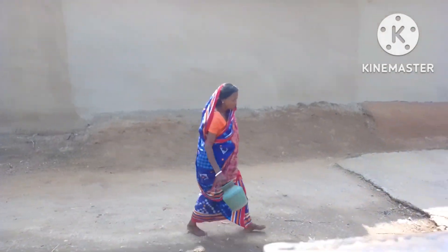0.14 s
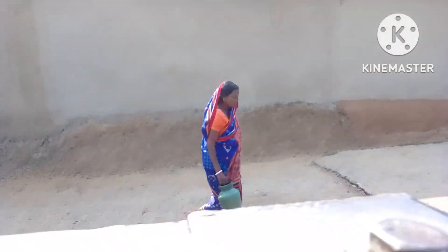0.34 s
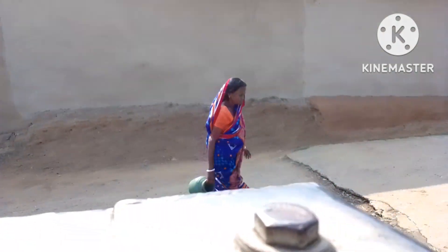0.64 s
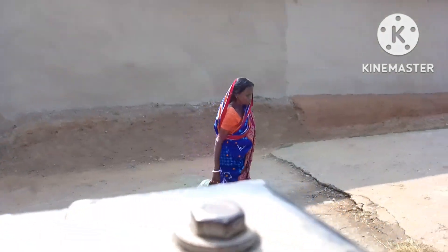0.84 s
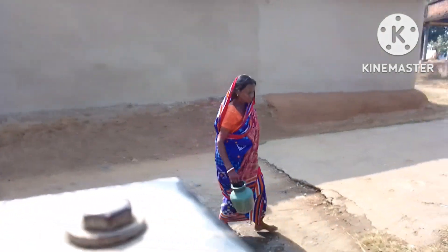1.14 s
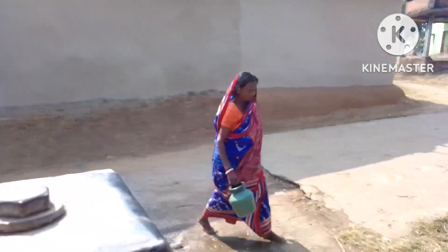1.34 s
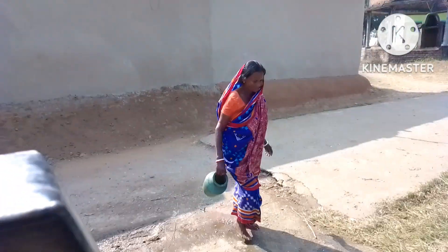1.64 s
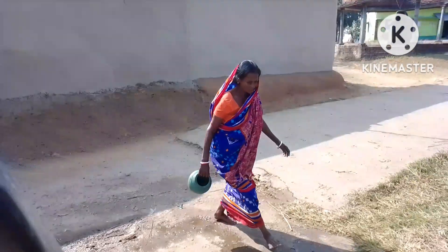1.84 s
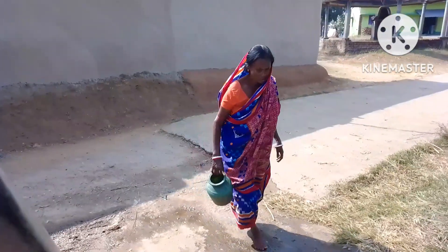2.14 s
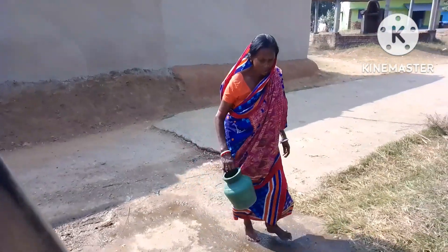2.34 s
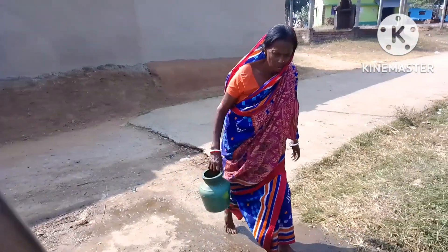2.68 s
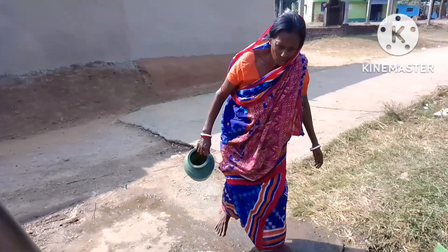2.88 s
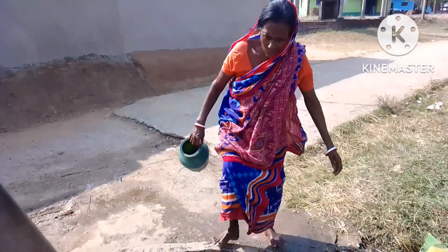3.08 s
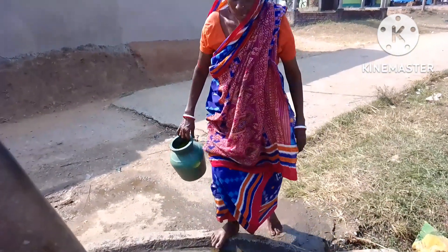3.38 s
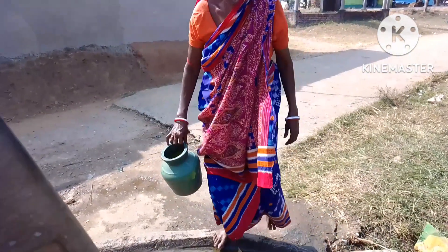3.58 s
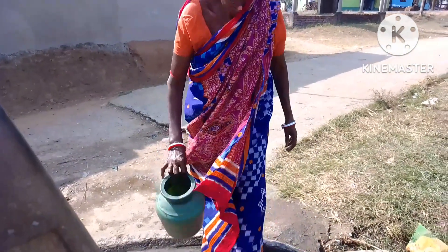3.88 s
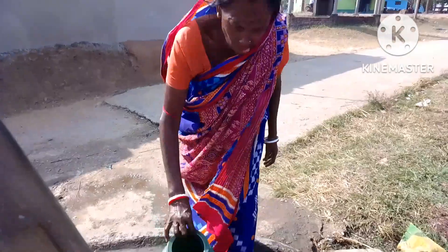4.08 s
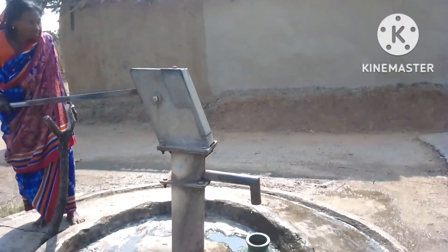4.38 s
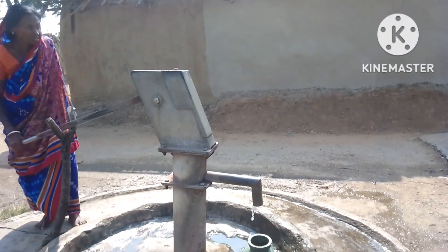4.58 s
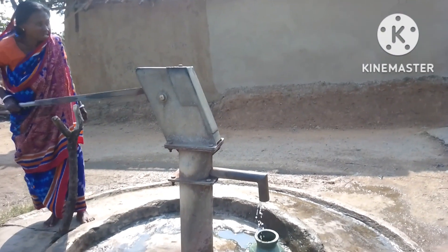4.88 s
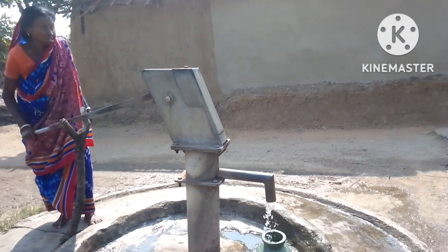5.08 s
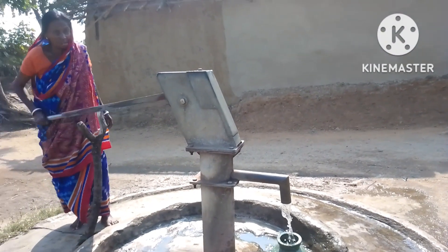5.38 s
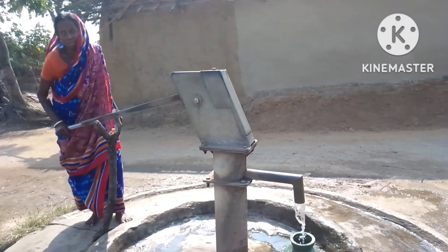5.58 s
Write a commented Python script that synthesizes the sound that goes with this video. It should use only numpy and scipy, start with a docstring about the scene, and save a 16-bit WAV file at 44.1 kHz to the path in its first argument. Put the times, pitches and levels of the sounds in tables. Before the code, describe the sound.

An iron hand pump is worked close by outdoors, its handle and rod rattling and its dry pivot giving short squeaks. It comes in after a quiet opening of gritty steps, soft hiss and a far engine. Water soon splashes from the spout, surging with each stroke, and near the end adds hollow gulps inside a pot. A low village rumble and a slow distant engine lie underneath.

```python
"""First a far engine speeds up under a thin high hiss, and grit ticks underfoot in a village lane.
The sound drops out for a moment. Then, close to the microphone, an iron hand pump is worked about twice
a second: handle and rod clank and rattle, the dry pivot squeaks and the casing rings. Water splashes
from the spout as clouds of tiny bubbles, then gulps into a pot, stirring the air inside.
Behind it all the village rumbles and a distant engine chugs slowly."""
import sys
import numpy as np
from scipy import signal
from scipy.fft import rfft, irfft, next_fast_len
from scipy.io import wavfile
from scipy.ndimage import map_coordinates

SR = 44100
rng = np.random.default_rng(int(sys.argv[2]) if len(sys.argv) > 2 else 0)


def digitize_waveform(pressure):
    """Quantize a signal to 16-bit integers and store it at the path in sys.argv[1].

    Rows of a 2-D input are taken as channels; values are limited to [-1, 1].
    """
    field = np.atleast_2d(pressure).T
    bounded = np.clip(field, -1, 1)
    quanta = np.round(bounded * 32767).astype(np.int16)
    wavfile.write(sys.argv[1], SR, quanta)


N = 252252
T = np.arange(N) / SR
PRIMED_S = 2.68  # the water bursts out


# Handle and rod, close up, loudest at the ends of each stroke. Each row: start in seconds,
# then strength, thud and bright edge in relative dB, then contact resonance in Hz.
HANDLE_CLANKS = [(1.8492, -32, -3, -0.5, 1540), (1.9275, -31, -14, -6, 1060), (1.972, -29.5, -2, -24, 1650),
                 (2.0158, -27.5, -4.5, -17, 2340), (2.0818, -24, -17, -6, 1260),
                 (2.1084, -29, -11.5, -6, 1730), (2.144, -28.5, -10, -11, 2850),
                 (2.1824, -24, -8, -5.5, 1790), (2.3962, -30.5, 0.5, -5.5, 1740),
                 (2.522, -29, -8, -6, 1070), (2.6575, -17.5, -15.5, 0.5, 5430),
                 (2.7108, -24.5, -9, -3, 3800), (2.825, -34.5, -15, 5.5, 1470),
                 (2.9364, -32, -2.5, 1, 1785), (2.972, -21.5, -17, -8, 4350),
                 (3.1968, -15.5, -23.5, -7, 4900), (3.5104, -25.5, -21, -11, 2550),
                 (3.7978, -19.5, -13.5, -8.5, 2730), (3.8746, -26, -20, -9, 1590),
                 (4.0551, -22, -14.5, -11, 4330), (4.3127, -20.5, -15, -1.5, 2250),
                 (4.6029, -25, -8, -20, 1400), (4.8652, -16, -13, 1.5, 2300), (4.8986, -26, -14, 4, 2400),
                 (4.9729, -27.5, -7.5, -16, 2380), (5.1442, -20.5, -8, -2.5, 4100)]
# The colour of a knock on the iron. Each row: frequency in Hz, gain in dB.
KNOCK_SPECTRUM = [(200, 7), (450, 3), (850, -2), (1200, 4.5), (1950, 1), (2400, -1), (3200, 0.5), (4500, 3),
                  (5500, -11.5), (6200, -30.5), (7500, -34.5), (12500, -30), (15500, -78)]

def clanks():
    """Loose iron joints strike, chatter and rattle; the harder the knock, the briefer its chatter."""
    knocks, t = np.zeros(N), np.arange(SR // 3) / SR
    duller_from_s, strike_t60, rattle_t60 = 2.9, .038, .32
    for s, db, thud_db, edge_db, contact_hz in HANDLE_CLANKS:
        brightness = 1.117 if s < duller_from_s else 1  # the early clanks sound brighter
        chatter_t60 = .12 * 2 ** ((-25 - db) / 24.5)
        # tiny contacts, about a millisecond each
        chatter_db = 2 * np.interp(t, np.arange(300) / 900, rng.standard_normal(300))
        contacts = unit(rng.standard_normal(len(t)) * amp(chatter_db))
        decay = amp(-2.5 - 60 * t / strike_t60) + amp(-60 * t / chatter_t60)
        decay += amp(-22 - 60 * t / rattle_t60)
        burst = contacts * decay * (1 - np.exp(-t / .0015))
        tilt = [(450, thud_db + 4.5), (900, thud_db + 10.5), (1500, 0), (2900, 0), (4200, edge_db + 6.5)]
        colour = lambda f: amp(along(KNOCK_SPECTRUM, f / brightness) + along(tilt, f))
        joint = lambda f: colour(f) * (1 + amp(2) * resonance(f, contact_hz, contact_hz / 8))
        add(knocks, s, amp(db - 9.5) * filtered(burst, joint))
    return knocks


# The ringing modes of the casing. Each row: frequency in Hz, relative gain in dB.
CASING_MODES = [(518, 16), (562, 19), (680, 10.5), (776, 20.5), (798, 20), (968, 11.5), (1030, 10),
                (1067, 11), (1135, 6), (1250, 7.5), (1352, 7.5), (1579, -22), (1791, 10.5), (2316, -3),
                (2382, 11), (2686, 5), (4367, 0.5), (4767, -37), (4861, -5), (5553, 5.5)]

def pump():
    """The knocks, and the rod scraping as it lifts water, set the iron casing ringing."""
    knocks = clanks()
    scrape = noise(KNOCK_SPECTRUM) * amp(curves(SPOUT_FLOW)[0] - 5 + surge()) * pumping()
    casing = lambda f: sum(amp(db - .5) * resonance(f, hz, 8 * hz / 700) for hz, db in CASING_MODES)
    # the many weaker modes of the sheet-metal head blur into a clatter
    clatter = filtered(smeared(knocks, t60=.42), lambda f: resonance(f, 920, 730))
    return knocks + filtered(knocks + scrape, casing) + amp(1.5) * clatter


# Squeaks at the handle. Each row: start and length in seconds, pitch in Hz, rms level at the crest in dB.
PIVOT_SQUEAKS = [(1.95, 0.036, 5250, -47), (3.748, 0.052, 2450, -41), (3.797, 0.032, 2620, -34),
                 (4.15, 0.098, 2420, -46), (4.68, 0.051, 2390, -42.5), (4.86, 0.023, 2360, -29),
                 (5.252, 0.075, 2590, -45.5)]

def squeaks():
    """The dry pivot sticks and slips in a narrow, rough band."""
    out, t = np.zeros(N), np.arange(SR // 5) / SR
    for s, length, hz, db in PIVOT_SQUEAKS:
        band = noise_band(hz, width_hz=250, samples=len(t))
        add(out, s, amp(db) * band * np.sin(np.pi * np.minimum(t / length, 1)))
    return out


# The stream at the spout, close by. Each row: time in seconds, splash and spray in relative dB.
SPOUT_FLOW = [(1.8, -44.5, -58), (1.89, -57, -63), (2.02, -53.5, -61.5), (2.41, -53.5, -64),
              (2.62, -45.5, -58), (2.85, -48.5, -53), (3.27, -49, -42.5), (3.62, -45, -45),
              (4.63, -47, -47.5), (4.78, -43, -47), (5.34, -46, -47.5), (5.57, -42, -48),
              (5.72, -40.5, -62)]
# The spray sounds duller as its treble cutoff sinks. Each row: time in seconds, cutoff in Hz.
SPRAY_CUTOFF = [(2.8, 5830), (3.1, 4400), (5.0, 4850), (5.72, 4250)]
# The colours of splash, spray and fine mist. Each row: frequency in Hz, gain in dB.
SPLASH_SPECTRUM = [(250, 5), (400, 0.5), (650, -11), (950, -6.5), (1350, 1.5), (2000, 1), (2600, 2),
                   (3300, -5.5), (4200, -14), (6000, -48)]
SPRAY_SPECTRUM = [(2500, -1), (3400, -3.5), (4200, 5.5), (5600, 1), (6500, 9.5), (8000, 5)]
MIST_SPECTRUM = [(4000, -26), (6000, 9), (7000, 5), (8200, -3), (10000, 10.5), (12200, 13.5), (13300, 6),
                 (15000, -23)]

def water():
    """The stream breaks into splashing bubbles, spray and mist, in uneven spurts."""
    splash_db, spray_db = curves(SPOUT_FLOW)
    mist_db = -69.5 - np.maximum(51 * (PRIMED_S - T), 2.5 * (T - PRIMED_S))  # fast rise, slow fall
    spurts_db = .38 * wobble(21.85) + 1.7 * wobble(110)
    large = bubbles(per_s=3500, hz=1500, octaves=1.6, cycles=3.5, size_db=3)
    small = bubbles(per_s=2800, hz=4400, octaves=.6, cycles=7, size_db=3.5)
    gurgle = bubbles(per_s=170, hz=1900, octaves=1.2, cycles=16, size_db=3, samples=2000)
    splash = coloured(large + amp(-6.5) * gurgle + .65 * rng.standard_normal(N), SPLASH_SPECTRUM)
    spray = coloured(small + .85 * rng.standard_normal(N), SPRAY_SPECTRUM)
    hz, s, frames = signal.stft(spray, SR, nperseg=256)
    edge_hz = np.interp(s, *np.transpose(SPRAY_CUTOFF))
    frames /= np.sqrt(1 + (hz[:, None] / edge_hz) ** 20)
    spray = unit(signal.istft(frames, SR, nperseg=256)[1][:N])
    fizz = bubbles(per_s=1000, hz=9200, octaves=.88, cycles=1, size_db=7)
    mist = coloured(fizz + 1.9 * rng.standard_normal(N), MIST_SPECTRUM)
    splash *= amp(splash_db - .5 + surge() + wobble(14))
    spray *= amp(spray_db + 1 + .63 * surge())
    mist *= amp(mist_db + 3.5 * wobble(90))
    return (splash + spray + mist) * amp(spurts_db) * pumping()


def bubbles(per_s, hz, octaves, cycles, size_db, samples=400):
    """A cloud of tiny damped bubbles of uneven pitch and size, at rms 1."""
    start, pitch, size = rng.random((int(per_s * N / SR), 3)).T
    turns = hz * 2 ** (octaves * (2 * pitch[:, None] - 1)) * np.arange(samples) / SR
    gains = amp(size_db * np.minimum(-np.log(1 - size), 5))
    rings = gains[:, None] * np.sin(2 * np.pi * turns) * np.exp(-turns / cycles)
    at = (start[:, None] * N).astype(int) + np.arange(samples)
    return unit(np.bincount(at.ravel(), rings.ravel(), N)[:N])


def surge(stroke_s=.556, crest_s=4.15):
    """The swing of the flow with each stroke of the handle, in dB."""
    return 2.5 * np.cos(2 * np.pi * (T - crest_s) / stroke_s)


def pumping():
    """Rises from 0 to 1 as the handle starts to move."""
    return np.interp(T, [1.76, 1.87], [0, 1])


# The main splats under the spout. Each row: start in seconds, pitch in Hz, peak level in dB.
MAIN_SPLATS = [(2.810, 4500, -31), (3.099, 3820, -27.5), (3.181, 4000, -27), (3.222, 2830, -25),
               (3.305, 4030, -29.5), (3.973, 3740, -35), (4.052, 700, -36), (4.547, 4140, -32),
               (5.446, 2970, -30)]

def splats(per_s=4):
    """Drops land with a snap; more fall at random once the pump is primed."""
    running_s = N / SR - PRIMED_S
    strays = [(PRIMED_S + running_s * when, 3600 * 2 ** (.5 * (pitch - .5)), -34 + 6 * (size - .5))
              for when, pitch, size in rng.random((int(per_s * running_s), 3))]
    return snaps(list(MAIN_SPLATS) + strays, t60=.016, sharpness=6, crack_db=-38)


# Gulps in the pot under the stream. Each row: start in seconds, peak level in dB.
POT_GULPS = [(5.026, -32.5), (5.068, -32.5), (5.288, -32), (5.407, -31), (5.442, -35), (5.497, -23.5),
             (5.615, -32.5)]

def pot(full_stream_s=4.98, gulp_t60=.12):
    """Falling water stirs the air in the pot: a swelling hum, and damped gulps near the same note."""
    hum = noise_band(261, width_hz=77) * amp(-49.5 - 9.5 * np.maximum(full_stream_s - T, 0))
    gulps, t = np.zeros(N), np.arange(SR // 3) / SR
    for s, db in POT_GULPS:
        hz = 282 * (1 + .027 * rng.standard_normal())
        envelope = amp(db - 60 * t / gulp_t60) * (1 - np.exp(-t / .0017))
        add(gulps, s, envelope * np.sin(2 * np.pi * hz * t))
    return hum + gulps


# Grit on the ground of the lane. Each row: start in seconds, pitch in Hz, peak level in dB.
GRIT_TICKS = [(.065, 8800, -53), (.184, 4400, -46.5), (.375, 9000, -53), (.475, 4000, -47.5),
              (.502, 4750, -49), (1.526, 5160, -43), (2.283, 4270, -37), (2.321, 4700, -41),
              (2.350, 4200, -35.5)]

def grit():
    """Grains tick underfoot, each a short, broad snap."""
    return snaps(GRIT_TICKS, t60=.028, sharpness=1, crack_db=-23)


# Exhaust and gear whine, far off. Each row: multiple of the firing rate, relative level in dB.
ENGINE_ORDERS = [(1, -10.5), (2, -0.5), (3, -2), (4, -12), (5, -21.5), (16, -25.5)]

def revving_engine(top_hz=66.7, throttle_off_s=1.42, gone_s=1.91):
    """An engine grows louder as it speeds up, holds, slows with the throttle closed and fades away."""
    firing_hz = np.minimum(39.98 + 21.2 * T, top_hz) - 28 * np.clip(T - throttle_off_s, 0, 1)
    lull = np.exp(-((T - throttle_off_s) / .15 - .5) ** 2)
    level_db = -44 + .19 * (firing_hz - top_hz) - 6.5 * lull
    phase = 2 * np.pi * np.cumsum(firing_hz * (1 + .0026 * wobble(18.3))) / SR
    exhaust = sum(amp(db + 1.4 * wobble(6.85)) * np.sin(order * phase + rng.uniform(0, 2 * np.pi))
                  for order, db in ENGINE_ORDERS)
    return unit(exhaust) * amp(level_db) * np.clip((gone_s - T) / .095, 0, 1)


# A slow engine in the distance. Each row: time in seconds, firing rate in Hz, level in dB.
CHUG_COURSE = [(1.7, 17, -72), (2.1, 16.2, -51.5), (3.2, 17.2, -47.5), (4.05, 18.1, -41.5),
               (4.7, 17.6, -44.5), (5.2, 18.3, -48.5), (5.72, 16.5, -51)]
# Its muffler, heard from the lane. Each row: frequency in Hz, gain in dB.
MUFFLER_SPECTRUM = [(30, -28), (60, -44), (90, -5.5), (120, -2.5), (146, 7), (175, -1), (220, -23),
                    (350, -18.5), (700, -56.5)]

def chugging_engine():
    """Slow, uneven exhaust puffs boom in a far muffler and smear between the houses."""
    firing_hz, level_db = curves(CHUG_COURSE)
    firings = np.cumsum(firing_hz) / SR + .06 * wobble(18)
    puffs = np.diff(np.floor(firings), prepend=0) * amp(2.8 * wobble(30))
    return coloured(puffs + amp(1) * smeared(puffs, t60=.25), MUFFLER_SPECTRUM) * amp(level_db)


def boom(crest_s=2.78, width_s=.27):
    """A narrow low noise swells and fades once."""
    return noise_band(83, width_hz=41.5) * amp(-48.5) * np.exp(-((T - crest_s) / width_s) ** 2 / 2)


# The colours of rumble, air and hiss around the microphone. Each row: frequency in Hz, gain in dB.
RUMBLE_SPECTRUM = [(12, -26), (25, -2), (55, 0), (90, -2), (160, 2), (250, -4.5), (340, -13), (450, -20.5),
                   (900, -58)]
AIR_SPECTRUM = [(150, -37), (450, -4.5), (700, 2.5), (1000, -4.5), (1900, -7), (3000, -9.5), (4300, -10),
                (5200, -21.5), (8500, -34.5), (13000, -45.5)]
HISS_SPECTRUM = [(4500, -22), (6200, -8), (7600, -2), (8600, -3), (9100, -11), (12000, -30)]
# How each of the three rises and falls. Each row: time in seconds, level in dB.
RUMBLE_LEVELS = [(0, -55), (1.3, -51.5), (2.2, -50.5), (5.72, -48.5)]
AIR_LEVELS = [(0, -63), (1.2, -56.5), (1.66, -59), (1.74, -58.5), (2.6, -67.5), (5.72, -82)]
HISS_LEVELS = [(0, -73.5), (.9, -66), (1.67, -67.5), (1.73, -77), (2.7, -80)]

def village():
    """A throbbing low rumble, open air and a thin high hiss, perhaps insects."""
    rumble = noise(RUMBLE_SPECTRUM) * amp(curves(RUMBLE_LEVELS)[0] + 1.33 * wobble(20))
    air = noise(AIR_SPECTRUM) * amp(curves(AIR_LEVELS)[0])
    hiss = noise(HISS_SPECTRUM) * amp(curves(HISS_LEVELS)[0])
    return rumble + air + hiss


def snaps(rows, t60, sharpness, crack_db):
    """Tiny noisy impacts, each in a resonance of its own."""
    out, t = np.zeros(N), np.arange(SR // 10) / SR
    for s, hz, db in rows:
        burst = rng.standard_normal(len(t)) * amp(-60 * t / t60)
        skirt = lambda f: np.abs(resonance(f, hz, hz / 2)) ** 2 + amp(crack_db)
        snap = filtered(burst, lambda f: resonance(f, hz, hz / sharpness) * skirt(f))
        add(out, s, amp(db) * snap / np.abs(snap).max())
    return out


def smeared(x, t60):
    """x echoed by a dense tail that dies in t60 seconds."""
    t = np.arange(SR // 2) / SR
    tail = rng.standard_normal(len(t)) * amp(-60 * t / t60)
    return signal.fftconvolve(x, tail / np.linalg.norm(tail))[:N]


def amp(db):
    """Decibels to gain."""
    return 10 ** (np.asarray(db) / 20)


def unit(x):
    """Scale to rms 1."""
    return x / np.sqrt(np.mean(x ** 2) + 1e-20)


def along(points, hz):
    """Interpolate (Hz, value) points on a log axis."""
    f, v = np.transpose(points)
    return np.interp(np.log(hz + 1), np.log(f + 1), v)


def curves(rows):
    """One value per sample for each column after the time."""
    s, *cols = np.transpose(rows)
    return [np.interp(T, s, c) for c in cols]


def wobble(rate):
    """A smooth random curve, rate knots a second."""
    return map_coordinates(rng.standard_normal(int(N * rate / SR) + 4), [T * rate])


def filtered(x, response):
    """x times a response of frequency."""
    m = next_fast_len(len(x) + SR // 4)
    return irfft(rfft(x, m) * response(np.fft.rfftfreq(m, 1 / SR)), m)[:len(x)]


def coloured(x, spectrum):
    """x shaped by a spectrum, at rms 1."""
    return unit(filtered(x, lambda hz: amp(along(spectrum, hz))))


def noise(spectrum):
    """Noise with this spectrum, at rms 1."""
    return coloured(rng.standard_normal(N), spectrum)


def noise_band(hz, width_hz, samples=N):
    """Narrow noise around hz, at rms 1."""
    return unit(filtered(rng.standard_normal(samples), lambda f: resonance(f, hz, width_hz) ** 2))


def resonance(f, hz, width):
    """Response of one damped mode."""
    return 1j * f * width / (hz * hz - f * f + 1j * f * width)


def add(track, s, sound):
    """Mix a sound into the track at s seconds."""
    part = track[max(round(s * SR), 0):][:len(sound)]
    part += sound[:len(part)]


def scene():
    """One microphone in the lane: pump, water and pot close by, the village behind."""
    near = pump() + squeaks() + water() + pot()
    far = revving_engine() + village() + boom() + chugging_engine()
    return (near + grit() + splats() + far)[None]


def record(dry):
    """The signal rides on a small offset, so the dropout starts and ends with a soft click."""
    offset, cutoff_hz = .019, 15500
    drop_s, return_s = 1.6745, 1.7235
    live = (T < drop_s) | (T > return_s)
    centred = (dry[0] + offset) * live - offset
    return (filtered(centred, lambda hz: hz < cutoff_hz) + offset)[None]


dry = scene()
out = record(dry)
digitize_waveform(out)
```